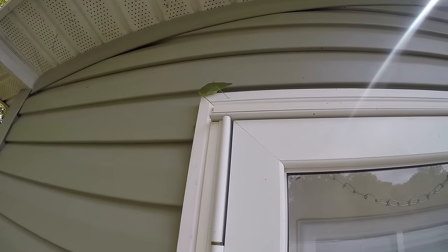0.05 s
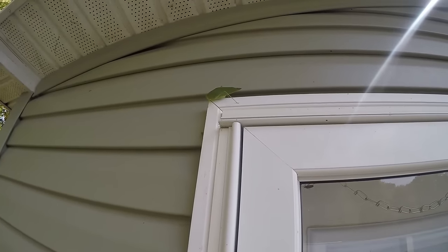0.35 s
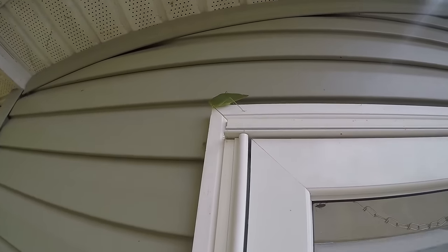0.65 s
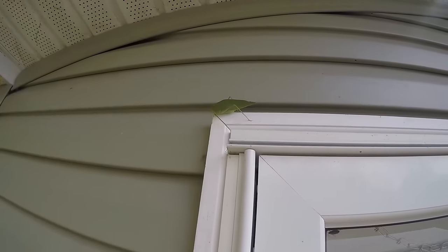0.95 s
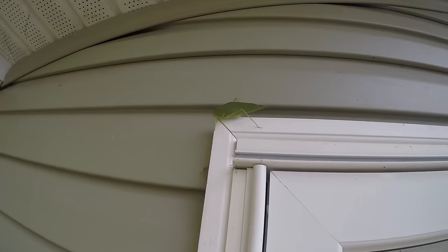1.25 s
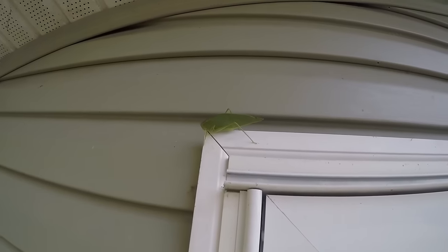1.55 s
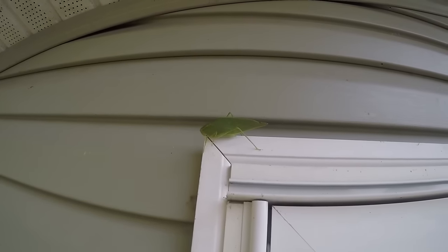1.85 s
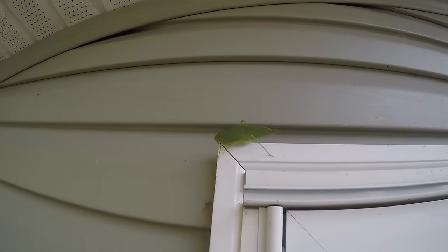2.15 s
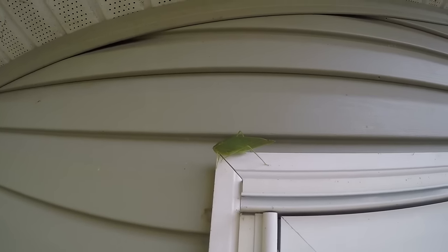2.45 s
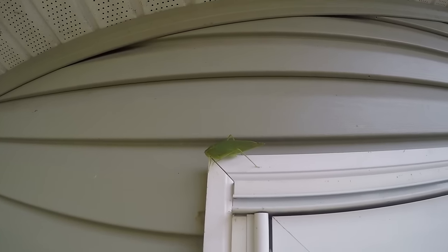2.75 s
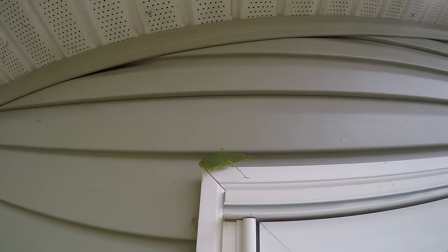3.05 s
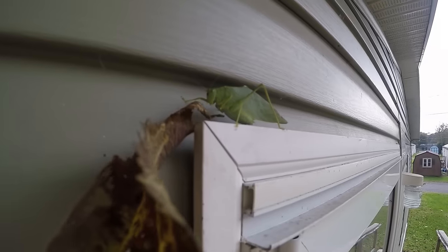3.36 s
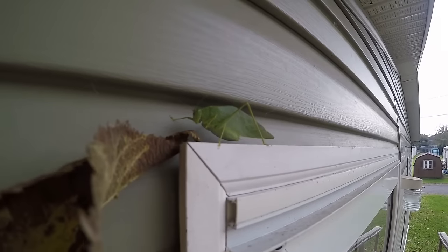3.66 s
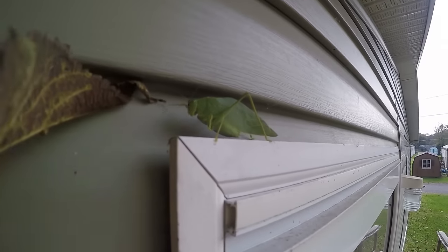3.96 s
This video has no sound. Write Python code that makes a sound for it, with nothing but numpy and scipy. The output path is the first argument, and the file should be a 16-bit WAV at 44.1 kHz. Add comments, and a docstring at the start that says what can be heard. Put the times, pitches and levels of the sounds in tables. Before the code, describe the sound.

A nearby insect repeats rapid, high chirps by a house wall, with fainter insects and crickets, a machine hum and low rumble behind. Near the end, a dry leaf rustles and a few knocks land close to the handheld microphone.

```python
"""By a house wall, insects sing by stridulation, drawing a scraper over a toothed file on the wing.
One near singer repeats a short falling chirp; farther ones drift in and out of step with it.
Behind them are a thin cricket chorus, a machine hum and low outdoor rumble. A dry leaf stirs
now and then, and near the end it rustles, scrapes and knocks close to the handheld camera."""
import sys
import numpy as np
from scipy import signal
from scipy.fft import rfft, irfft
from scipy.io import wavfile

SR = 44100
rng = np.random.default_rng(int(sys.argv[2]) if len(sys.argv) > 2 else 0)


def put_to_file(sound):
    """Save the sound as 16-bit audio at rate SR, in the file named by the first command-line argument."""
    columns = np.atleast_2d(sound).T  # one column per channel
    safe = np.clip(columns, -1, 1)
    whole_steps = np.round(safe * 32767)
    wavfile.write(sys.argv[1], SR, whole_steps.astype(np.int16))


N = 176400
TIME = np.arange(N) / SR


def undb(db):
    """Amplitude grows tenfold for every 20 dB."""
    return 10 ** (np.asarray(db) / 20)

def unit(x):
    """Normalisation to rms 1."""
    return x / np.sqrt(np.mean(x ** 2))

def curve(rows, t):
    """Linear interpolation between table rows."""
    return np.interp(t, *np.array(rows).T)

def phase(hz):
    """Phase is the integral of frequency."""
    return 2 * np.pi * np.cumsum(hz) / SR

def noise(gain_at):
    """Spectral shaping of white noise, scaled to rms 1."""
    hz = np.arange(N // 2 + 1) * SR / N + 1e-3
    return unit(irfft(rfft(rng.standard_normal(N)) * gain_at(hz), N))

def band(hz, width_hz):
    """A steep resonance driven by noise."""
    return noise(lambda f: 1 / (1 + 2 * ((f - hz * hz / f) / width_hz) ** 2))

def wander(hz):
    """Low-passed noise: a smooth random fluctuation of rms 1."""
    return noise(lambda f: np.exp(-(f / hz) ** 2))

def narrow(hz, width_hz):
    """Random quadrature modulation spreads a moving tone into a narrow band."""
    angle = phase(hz)
    return unit(wander(width_hz / 2) * np.sin(angle) + wander(width_hz / 2) * np.cos(angle))

def swell(start_s, length_s):
    """A rounded envelope: the root of a half sine."""
    return np.sqrt(np.abs(np.sin(np.pi * np.clip((TIME - start_s) / length_s, 0, 1))))

def add(out, start_s, sound):
    """Superposition of a sound at a given time."""
    i = int(round(start_s * SR))
    a, b = max(i, 0), min(i + len(sound), N)
    if b > a:
        out[a:b] += sound[a - i:b - i]

def air():
    """Broadband outdoor noise, its spectral density greatest in the bass."""
    # air spectrum: frequency_hz, relative_db
    spectrum = [(15, 1), (28, 6.5), (60, 1), (110, -1.5), (190, -6), (330, -10), (520, -14), (700, -26.5),
                (1200, -28.5), (1700, -35.5), (3000, -37), (6000, -42), (9000, -46), (12000, -48),
                (15500, -46.5)]
    hz, db = np.array(spectrum).T
    broadband = noise(lambda f: undb(np.interp(np.log(f), np.log(hz), db)))
    return broadband * undb(-43 + .6 * wander(3))

def rumble():
    """Slow amplitude modulation swells a deep noise band and a low-middle wash."""
    # deep envelope: time_s, level_db
    deep = [(0, -54), (.35, -43.5), (.6, -54), (1.45, -42), (2.3, -56), (2.73, -30), (2.95, -61),
            (3.7, -43), (4, -42)]
    # wash envelope: time_s, level_db
    wash = [(0, -62), (1.1, -68), (1.7, -50.5), (2.05, -69), (2.75, -50), (3.4, -58), (4, -48.5)]
    return band(46.46, 4.4) * undb(curve(deep, TIME)) + band(440, 150) * undb(curve(wash, TIME))

def machine_hum():
    """Random amplitude and frequency modulation broaden a machine's spectral lines."""
    # hum lines: pitch_hz, width_hz, level_db
    lines = [(84.46, 9.6, -47.5), (270.9, 2.82, -51), (239, 22.1, -56.5), (429.5, 4.8, -63.5),
             (581, 15.8, -72.5)]
    out = np.zeros(N)
    for hz, width, db in lines:
        amplitude = np.sqrt(2) * undb(db + 2 * wander(width))
        out += amplitude * np.sin(phase(hz + width / 2 * wander(width)))
    return out

def chorus():
    """Many distant insects sum incoherently into flickering noise bands."""
    # chorus bands: centre_hz, width_hz, level_db
    bands = [(7550, 1180, -68.5), (8170, 140, -77.5), (4040, 1500, -74)]
    return sum(undb(db + 1.8 * wander(40)) * band(hz, width) for hz, width, db in bands)

def crickets():
    """Distant crickets take turns, each trill a narrow band on a gliding centre frequency."""
    # trills: start_s, length_s, first_hz, last_hz, level_db
    trills = [(0, 0.96, 3780, 4060, -76.5), (0.759, .4, 4050, 4220, -68.5), (0.902, .55, 3850, 3870, -72.5),
              (1.151, 0.57, 4130, 4420, -72.5), (1.544, 0.44, 3860, 3990, -72),
              (1.807, .7, 4210, 4300, -73), (2.82, 0.54, 4000, 4100, -72.5), (3.175, 0.37, 4010, 3860, -70),
              (3.316, 0.6, 4250, 4380, -68.5)]
    out = np.zeros(N)
    for start, length, first, last, db in trills:
        glide_hz = np.interp(TIME, [start, start + length], [first, last])
        out += undb(db) * swell(start, length) * narrow(glide_hz, width_hz=190)
    return out * undb(1.2 * wander(40))

def rustles():
    """Friction excites the surface resonances nearest each rub's centre; the dry leaf crackles on top."""
    # rubs: start_s, length_s, level_db, centre_hz, graininess, crackle_relative_db
    rubs = [(0.373, 0.0092, -53, 2480, .25, -12), (1.489, 0.051, -58.5, 4200, 0.23, -25),
            (1.716, 0.096, -63.5, 4170, 0.23, -25), (3.432, 0.046, -59.5, 3200, 0.42, -19),
            (3.492, 0.13, -57, 2820, 0.39, -24), (3.639, 0.012, -54.5, 3400, .25, -22),
            (3.688, 0.31, -59.5, 3260, 0.28, -18), (3.855, 0.015, -54, 4300, 0.4, -35),
            (3.896, 0.029, -48.5, 3200, 0.21, -24), (3.915, 0.03, -50, 6000, 0.2, -20),
            (3.938, 0.051, -49, 5600, 0.18, -7.5), (3.981, 0.036, -55.5, 3820, 0.16, -9)]
    # surface resonances: centre_hz, width_hz, relative_db
    resonances = [(1100, 1000, 0), (2180, 400, -6), (2820, 380, -1.5), (3340, 400, -4), (3920, 400, 0),
                  (4680, 600, 0), (5520, 450, -7), (6150, 600, 0)]
    # brittle leaf bands: centre_hz, width_hz, relative_db
    brittle = [(9700, 2700, 6), (13800, 3300, 6)]
    focus_octaves = .85
    drift = 1 + .012 * wander(12)
    modes = [(hz, undb(db) * narrow(hz * drift, width)) for hz, width, db in resonances]
    hiss = undb(-7.5) * band(5100, 6000)
    crackle = sum(undb(db) * band(hz, width) for hz, width, db in brittle)
    crackle = unit(crackle * np.exp(.3 * wander(600)))
    out, catches = np.zeros(N), wander(140)
    for start, length, db, centre, grain, crackle_db in rubs:
        rung = sum(mode * np.exp(-(np.log2(hz / centre) / focus_octaves) ** 2 / 2) for hz, mode in modes)
        friction = unit(rung) + hiss + undb(crackle_db) * crackle
        out += undb(db) * swell(start, length) * unit(friction * np.exp(grain * catches))
    return out

def squeak():
    """A faint tone slides down, unsteady through random frequency modulation."""
    # squeak envelope: time_s, level_db
    levels = [(1.505, -90), (1.52, -67), (1.548, -59), (1.565, -84)]
    start, end = levels[0][0], levels[-1][0]
    pitch_hz = np.interp(TIME, [start, end], [3680, 2480]) + 75 * wander(400)
    return undb(curve(levels, TIME)) * (TIME > start) * (TIME < end) * np.sin(phase(pitch_hz))

def knocks():
    """Each impact snaps, cracks, thuds and excites the damped modes of the camera body."""
    # impacts, with relative gains: time_s, ring_db, thud_db, snap_db
    impacts = [(3.6408, -21, -38, -17), (3.7056, -11, -12, -6), (3.7166, -9, -13, -11),
               (3.748, -31, -10.5, -25), (3.790, -15, -10, -22), (3.8115, 2.5, -17.5, -8),
               (3.813, 2.5, 3, 0), (3.8215, -3, -7, -11), (3.99, -13, -13.5, -5)]
    # body modes: pitch_hz, relative_db, t60_s
    body = [(404, 0.5, 0.025), (599, 6.5, 0.041), (780, -1.5, 0.019), (977, 0.5, 0.018), (1225, -7, 0.025),
            (1830, -11.5, 0.024), (2650, -3, 0.011), (3110, -0.5, 0.01), (3830, -4, 0.021),
            (4970, -6, 0.043), (5000, -2.5, 0.018)]
    contact_s, snap_s, crack_s, thud_s, thud_below_hz = .00032, .0018, .0012, .008, 1500
    out, t = np.zeros(N), TIME[:SR // 5]
    onset = 1 - np.exp(-t / contact_s)
    bright, middle, low = band(10500, 12000), band(3000, 4200), band(860, 900)
    for at, ring_db, thud_db, snap_db in impacts:
        part = (int(at * SR) + np.arange(len(t))) % N
        ring = np.zeros(len(t))
        for hz, db, t60 in body:
            drive = rng.choice([-1, 1]) * undb(-33 + (thud_db if hz < thud_below_hz else ring_db))
            detuned_hz = hz * (1 + .018 * rng.standard_normal())
            ring += drive * undb(db - 60 * t / t60) * np.sin(2 * np.pi * detuned_hz * t)
        snap = undb(-51 + snap_db) * bright[part] * np.exp(-t / snap_s)
        crack = undb(-35 + ring_db) * middle[part] * np.exp(-t / crack_s)
        thud = undb(-37 + thud_db) * low[part] * np.exp(-t / thud_s)
        add(out, at, snap + crack + onset * (thud + ring))
    return out

def yard(x, wet_db, t60_s=.055):
    """Reflections from wall, eaves and ground form a diffuse, exponentially decaying tail."""
    t = TIME[:SR // 2]
    tail = rng.standard_normal(len(t)) * undb(-60 * t / t60_s) * (t > .003)
    return x + undb(wet_db) * signal.fftconvolve(x, tail / np.linalg.norm(tail))[:N]

def chirps(times, levels_db, hz, sag_hz_per_s2, rough, stretch):
    """Stridulation: each stroke's tone sags as the wing slows, roughened by the file's uneven teeth."""
    # wing stroke envelope before stretching: time_s, relative_db
    stroke = [(0, -39), (.003, -10), (.0055, -4), (.010, -3.5), (.0135, -4.5), (.017, -7.5), (.02, -10.5),
              (.025, -53)]
    lead_s, sag_start_s = .0074 * stretch, .00647
    out, t = np.zeros(N), TIME[:int(stroke[-1][0] * stretch * SR)]
    shape = np.sqrt(2) * undb(curve(stroke, t / stretch))
    sag_hz = sag_hz_per_s2 * np.maximum(t - sag_start_s, 0) ** 2
    teeth, slip = wander(520), wander(550)
    for at, db in zip(times, levels_db):
        detune_hz, extra_sag, accent_db = rng.normal(0, [22, .049, .5])
        part = (int(at * SR) + np.arange(len(t))) % N
        pitch_hz = hz + detune_hz - (1 + extra_sag) * sag_hz + 330 * rough * slip[part]
        envelope = undb(db + accent_db) * shape * np.exp(rough * teeth[part] - rough ** 2)
        add(out, at - lead_s, envelope * np.sin(phase(pitch_hz)))
    return out

def far_singers():
    """Lower, more reverberant chirps, whose shorter periods shift them in phase against the near song."""
    # runs of chirps: start_s, end_s, period_s, pitch_hz, relative_db
    runs = [(.03, .23, .0588, 7480, -61), (.268, .62, .0574, 7480, -59), (.699, 1.76, .0583, 7480, -60),
            (.813, 1.42, .058, 7500, -60), (1.82, 2.24, .0576, 7480, -62),
            (2.457, 2.99, .0578, 7590, -59.5), (3.1, 3.98, .0592, 7440, -63)]
    out = np.zeros(N)
    for start, end, period, hz, db in runs:
        times = np.arange(start, end, period)
        out += chirps(times, np.full(len(times), db), hz, sag_hz_per_s2=2.25e6, rough=.37, stretch=1.25)
    return undb(1.5) * yard(out, wet_db=-12.5)

def near_singer():
    """An almost periodic train of wing strokes, so close that direct sound dominates."""
    # stroke timing against an even beat: time_s, lateness_ms
    lateness = [(0, -1), (.7, -1.5), (.81, 2), (.95, -2), (1.2, -1.5), (1.31, 6), (1.47, -3), (1.8, -2.5),
                (2.16, -4.5), (2.47, -5.5), (2.6, 0.5), (2.71, 0), (2.83, 0.5), (2.93, -1.5), (3.19, -5.5),
                (3.25, 5.5), (3.38, 2), (3.85, -2)]
    # song envelope: time_s, level_db
    levels = [(0, -50.5), (.45, -47), (.75, -48.5), (.9, -45), (.97, -49.5), (1.25, -53.5), (1.52, -45.5),
              (1.9, -51), (2.3, -47.5), (2.66, -45), (2.88, -52), (3.18, -46.5), (3.26, -50.5),
              (3.48, -49.5), (3.61, -47), (4, -46)]
    first_s, period_s = .0051, .06004
    beats = np.arange(first_s, N / SR, period_s)
    times = beats + curve(lateness, beats) / 1000
    song = chirps(times, curve(levels, times), hz=7880, sag_hz_per_s2=3.1e6, rough=.13, stretch=.95)
    return yard(song, wet_db=-33)

def scene():
    """Mid-side stereo: a weak uncorrelated side signal makes the ears differ a little."""
    mid = near_singer() + far_singers() + chorus() + crickets()
    mid += rumble() + machine_hum() + air() + rustles() + squeak() + knocks()
    side = undb(-21.5) * chorus() + undb(-35) * air() + undb(-22.5) * far_singers()
    side += undb(-29) * rustles()
    return np.array([mid + side, mid - side])

def record(dry):
    """Band limiting: the camera's steep low-pass filter cuts the highest treble."""
    return signal.sosfilt(signal.ellip(10, .2, 70, 15350, fs=SR, output="sos"), dry)

dry = scene()
out = record(dry)
put_to_file(out)
```